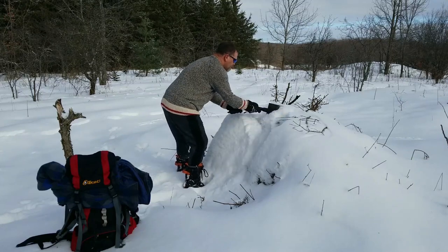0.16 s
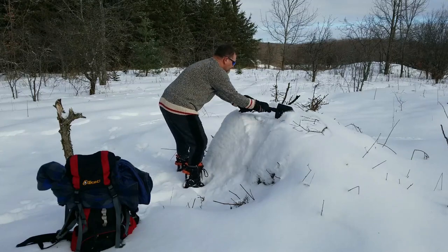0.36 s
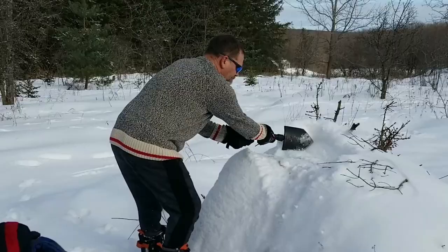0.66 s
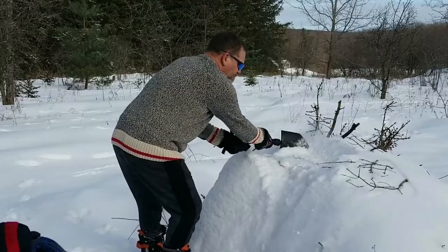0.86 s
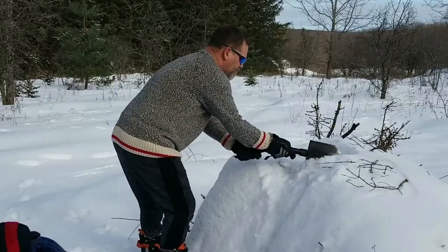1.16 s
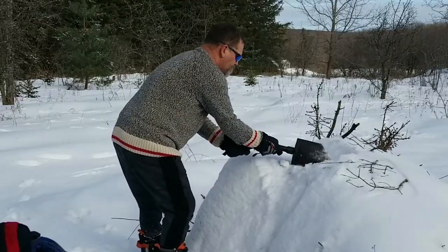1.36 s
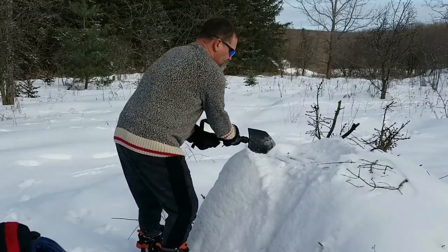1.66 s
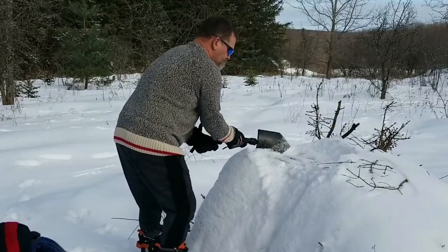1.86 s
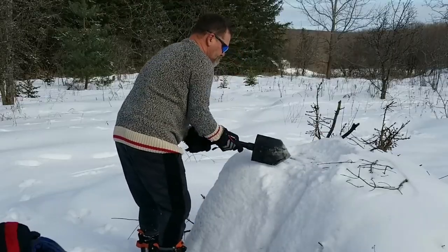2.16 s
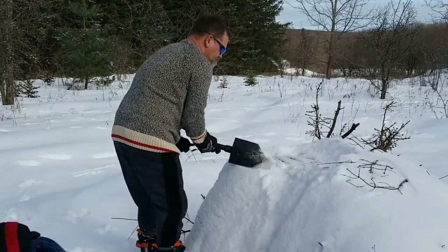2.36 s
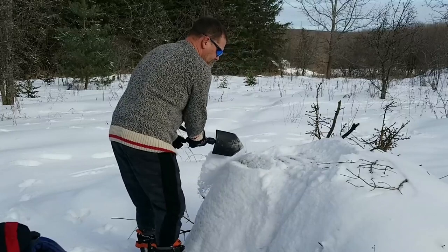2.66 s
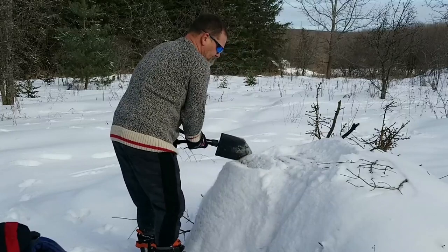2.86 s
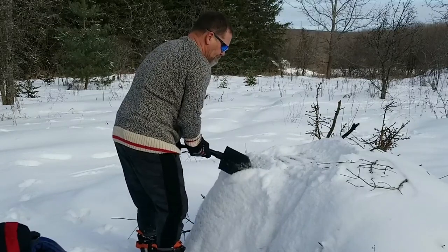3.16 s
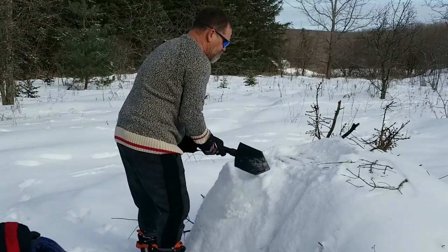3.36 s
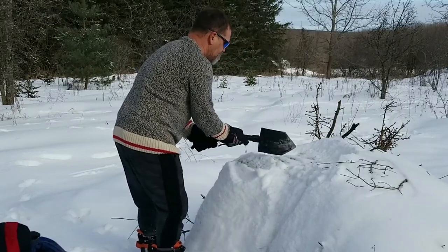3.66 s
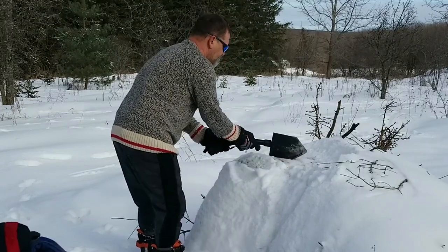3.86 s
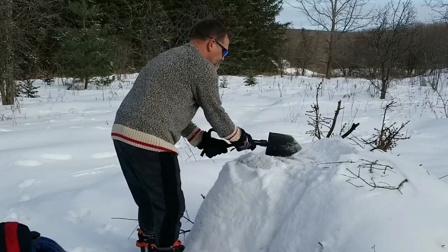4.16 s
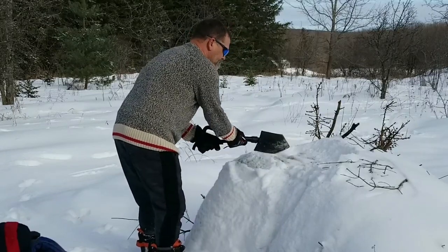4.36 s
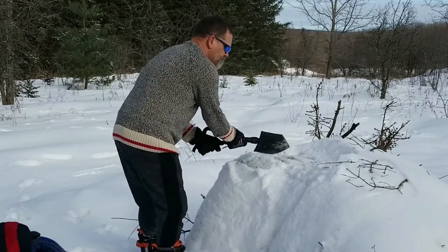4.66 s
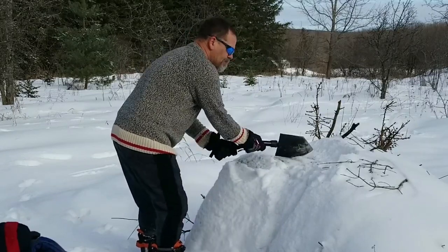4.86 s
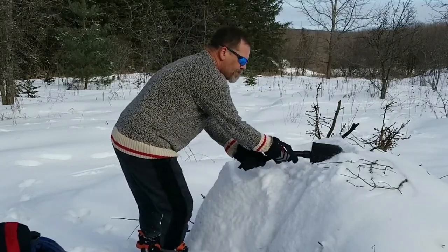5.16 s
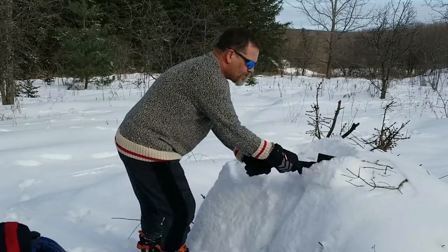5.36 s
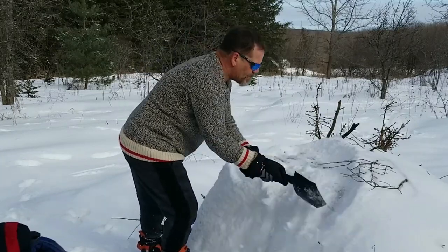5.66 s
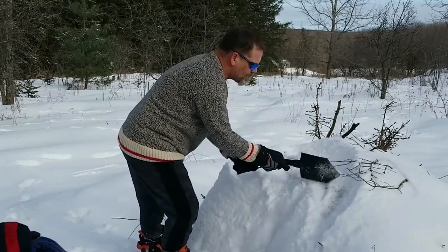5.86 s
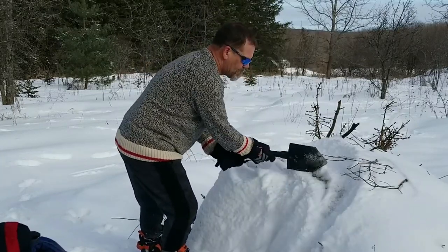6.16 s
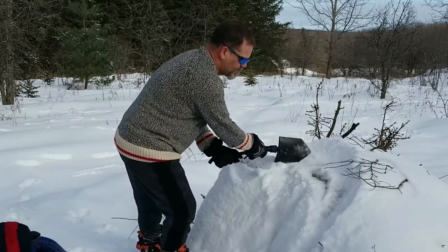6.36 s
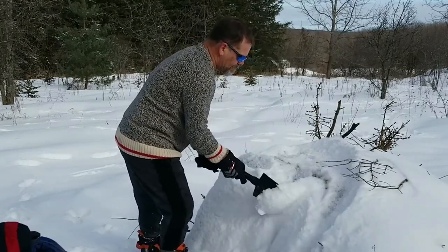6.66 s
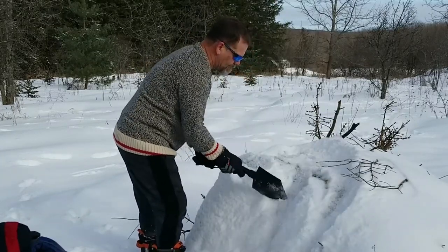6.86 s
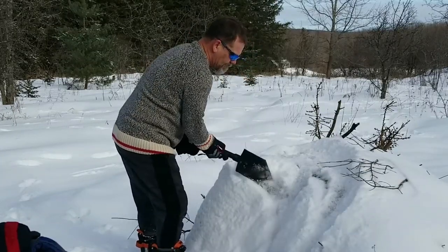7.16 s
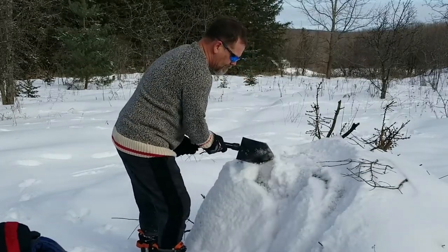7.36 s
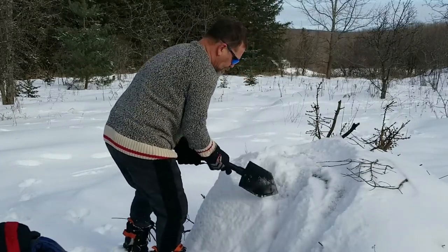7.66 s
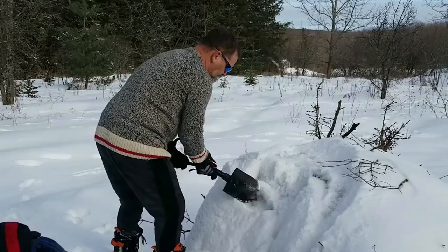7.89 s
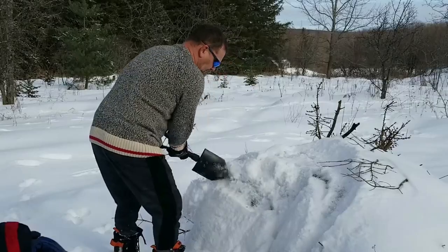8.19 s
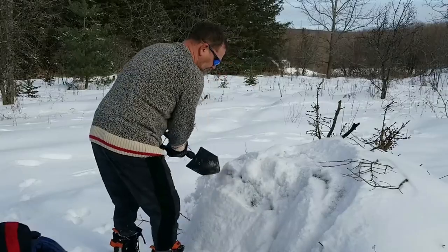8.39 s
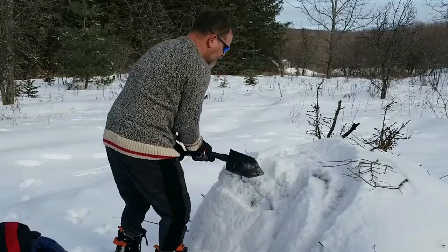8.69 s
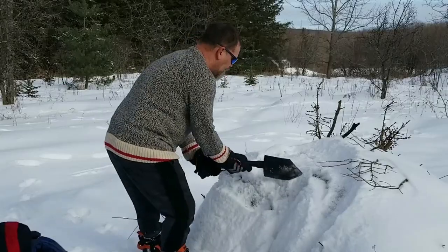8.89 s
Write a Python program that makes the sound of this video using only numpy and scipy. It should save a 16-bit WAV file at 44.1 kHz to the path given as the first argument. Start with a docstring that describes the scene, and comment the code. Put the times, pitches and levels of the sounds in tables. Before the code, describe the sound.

A close stereo microphone in a snowy clearing hears a small steel shovel, slightly left. From 0 to 0.8 s there are faint hisses of ice grains and light taps. Firm knocks with crunch come at 1.0, then a rapid, loud cluster of scrapes and metallic clinks at 1.35-1.6. A chop at 1.9-2.1 leaves a short ring; another tight crunching cluster lands at 2.45-2.55, a single clink at 2.9, then a pause. Lighter scrapes resume at 3.9-4.3. At 4.8-5.1 the freer blade rings longer through hissing strokes. Heavy crunching blows fill 5.8-6.15, followed by softer scrapes to 6.6 and again at 6.9-7.4. A deeper dig at 7.8-8.2 ends with two hard cracks; then near silence and a faint touch at 9.0. Low, soft wind buffets unevenly throughout, swelling near 6.9; a faint diffuse echo follows the blows.

```python
"""A faint hiss of ice grains, then crunching pushes and sharp knocks: a small steel shovel works crusted snow.
It chops and scrapes a mound in a clearing among winter trees. Random snaps through colouring filters make
the crunch and hiss; resonators make the rubbed blade sing. Each knock adds noise bursts for thud and crack
and decaying sines for the blade, brief when buried, longer when lifted clear. Shaped noise makes the light
wind on the microphone; decaying noise tails make the ground's answer and the faint echo of the trees."""
import sys
import numpy as np
from scipy import signal
from scipy.fft import rfft, irfft, next_fast_len
from scipy.io import wavfile
from scipy.ndimage import uniform_filter1d

SR = 44100
rng = np.random.default_rng(int(sys.argv[2]) if len(sys.argv) > 2 else 0)


def pcm_store(signal):
    """Save signal as 16-bit PCM."""
    levels = np.round(np.clip(np.atleast_2d(signal), -1, 1) * 32767)
    wavfile.write(sys.argv[1], SR, levels.astype(np.int16).T)


N = 398223

# Strong bending modes of the blade. Each row: nominal pitch in Hz, mean level when rubbed in dB,
# level when struck in dB relative to the whole ring, ring time as a share of the common t60.
BENDING_MODES = [(922, -25, -16.5, .58), (2044, -6.5, -8, 0.97), (2322, -5.5, -8, .58), (2534, -5, -8, .92),
                 (3322, -9.5, -10, 0.93)]
# Weaker modes of the blade. Each row: nominal pitch in Hz, mean relative level in dB,
# ring time as a share of their common t60.
WEAKER_MODES = [(372, -14.5, 1.6), (526.3, -5.5, 1), (1583, -11, 1.4), (3244, -1.5, 0.96), (3415, -8, .9),
                (3920, -2, 1), (4080, -4, 0.7), (4492, -3, 1), (5300, -3.5, 0.5), (5675, -6, 1.1),
                (6680, -7, 0.88), (8080, 0.5, 0.58), (11750, -3, 0.63)]


def from_db(db):
    """Decibels to gain."""
    return 10 ** (np.asarray(db) / 20)


def rms_one(x):
    """Scale to unit power."""
    return x / np.sqrt(np.mean(x ** 2) + 1e-20)


def in_time(rows):
    """Draw a curve of (seconds, value) rows at every sample."""
    seconds, values = np.transpose(rows)
    return np.interp(np.arange(N) / SR, seconds, values)


def drift(rate):
    """Random wander of unit power, drawn through this many random points per second."""
    knots = rng.standard_normal(int(N / SR * rate) + 2)
    return rms_one(np.interp(np.arange(N) / SR * rate, np.arange(len(knots)), knots))


def colour(x, points, size=4096):
    """Causal minimum-phase filter with the given spectrum; white noise keeps its power."""
    hz, db = np.transpose(points)
    grid = np.maximum(np.arange(size // 2 + 1) * SR / size, 1)
    gain = from_db(np.interp(np.log(grid), np.log(hz), db))
    # folding the cepstrum onto positive times gives minimum phase
    cepstrum = irfft(np.log(gain))
    cepstrum[1:size // 2] *= 2
    cepstrum[size // 2 + 1:] = 0
    response = irfft(np.exp(rfft(cepstrum)))
    return signal.oaconvolve(x, response / np.linalg.norm(response))[:len(x)]


def ring(x, hz, t60):
    """One resonant mode driven by x; white noise keeps its power."""
    radius = from_db(-60 / (max(t60, .002) * SR))
    angle = 2 * np.pi * hz / SR
    feed = np.sqrt((1 - radius * radius) / 2) * np.array([1, 0, -1])
    return signal.lfilter(feed, [1, -2 * radius * np.cos(angle), radius * radius], x + 1e-18)


def grains(per_s, spread_db):
    """Random snaps of uneven size and sign, at unit power."""
    sizes = from_db(spread_db * np.minimum(rng.exponential(1, N), 3.5))
    signs = rng.choice([-1, 1], N)
    return rms_one(sizes * signs * (rng.random(N) < per_s / SR))


def evened(x, span_s):
    """The hand keeps the work steady: power is levelled over each span, near-silence less so."""
    power = np.abs(uniform_filter1d(x * x, max(int(span_s * SR), 2)))
    return x / np.sqrt(power + 0.022)


def pressure():
    """Gains of crunch, singing and hiss: every push bites, swells, eases and stops, and leaves a trickle."""
    # Pushes of the blade through snow. Each row: three times in seconds, sorted to shape the effort
    # (swell, peak, ease), where the first sets the bite and the third when the stop and trickle begin;
    # then drive of packed snow crunching, blade singing and ice grains hissing in dB.
    strokes = [(0, .015, 0.036, -59, -59, -51), (0.039, 0.054, 0.072, -39, -43.5, -43),
               (.13, .18, .35, -57, -57, -54.5), (0.366, 0.424, .53, -64, -56.5, -54.5),
               (0.542, .56, 0.57, -45, -56.5, -50.5), (0.622, 0.743, 0.77, -70.5, -70, -53),
               (0.79, .81, 0.84, -76.5, -73, -55.5), (0.881, 0.948, 0.97, -48, -52, -38),
               (0.979, 1.044, 1.07, -49, -45, -42.5), (1.09, 1.127, 1.2, -47, -50.5, -44),
               (1.295, 1.424, 1.46, -49, -49.5, -49), (1.424, 1.462, 1.526, -35, -36, -33.5),
               (1.54, 1.567, 1.647, -55.5, -49.5, -48), (1.805, 1.856, 1.98, -53.5, -57, -44.5),
               (1.888, 1.966, 2.06, -38.5, -33, -34), (2.367, 2.402, 2.44, -59, -61.5, -51.5),
               (2.45, 2.492, 2.505, -37, -40, -40), (3.825, 3.882, 3.99, -61, -55.5, -56),
               (3.983, 4.074, 4.14, -47.5, -48, -47.5), (4.172, 4.225, 4.24, -46.5, -47, -44.5),
               (4.293, 4.306, 4.32, -47.5, -46, -43), (4.582, 4.605, 4.6, -86, -78, -65.5),
               (4.765, 4.85, 4.88, -49, -39, -38), (4.954, 5.075, 5.13, -42, -39.5, -38.5),
               (5.15, 5.16, 5.39, -64, -62, -57), (5.386, 5.452, 5.46, -50.5, -50, -45.5),
               (5.748, 5.766, 5.82, -75, -71, -65), (5.836, 5.89, 5.8, -42, -44, -47),
               (5.956, 5.979, 6.13, -32, -37, -36.5), (6.298, 6.303, 6.3, -69, -50, -46.5),
               (6.363, 6.353, 6.4, -51, -53.5, -46.5), (6.44, 6.459, 6.57, -50, -43, -40.5),
               (6.596, 6.664, 6.72, -80, -62, -62), (6.93, 6.948, 6.985, -56, -40.5, -38),
               (7, 7.05, 7.15, -41, -50, -42), (7.192, 7.225, 7.27, -55.5, -58, -54),
               (7.245, 7.297, 7.29, -48.5, -48, -44.5), (7.815, 7.92, 7.94, -55, -50, -45),
               (7.93, 8.04, 8.1, -38, -44.5, -37.5), (8.1, 8.15, 8.185, -38, -44, -39),
               (8.99, 9.021, 9.2, -57, -55, -53)]
    bite_s, build_db, ease_db = 0.019, 7.5, 7.5
    stop_db_per_s = 520
    trickle_db, trickle_db_per_s = -26, 52
    t = np.arange(0, N, 32) / SR
    power = np.zeros((3, 1))
    for bite_at, middle, stop_at, *levels_db in strokes:
        # the edge bites, pressure builds to the hardest moment, then eases
        bite = np.clip((t - bite_at) / bite_s + .5, 0, 1)
        after = np.maximum(t - stop_at, 0)
        effort_db = np.interp(t, np.sort([bite_at, middle, stop_at]), [-build_db, 0, -ease_db])
        push = from_db(effort_db - stop_db_per_s * after)
        trickle = from_db(trickle_db - trickle_db_per_s * after)
        power = power + np.outer(from_db(levels_db), bite * np.maximum(push, trickle)) ** 2
    return [np.interp(np.arange(N) / SR, t, np.sqrt(p)) for p in power]


def snowpack(x):
    """Light touches have little bass, heavy ones shake the mound; the hollow of the cut colours both."""
    # The hollow of the cut, lower where the blade goes deeper. Each row: time in seconds, pitch in Hz.
    hollow = [(0, 540), (5.5, 560), (5.95, 700), (7.2, 700), (7.9, 395)]
    hollow_db, hollow_t60_s = -23, 0.016
    heavy_db, mound_hz = -35.5, 420   # at this load the lows below this pitch pass in full
    load = np.sqrt(np.abs(uniform_filter1d(x * x, int(.03 * SR))))
    depth = np.minimum(load / from_db(heavy_db), 1)
    # each filter runs twice, so that the two bands join smoothly
    low, high = [np.tile(signal.butter(2, mound_hz, kind, fs=SR, output="sos"), (2, 1))
                 for kind in ("low", "high")]
    x = signal.sosfilt(high, x + 1e-18) + signal.sosfilt(low, x * depth + 1e-18)
    # the moving pitch is a crossfade between fixed resonators
    hollow_hz = in_time(hollow)
    pitches = np.geomspace(350, 850, 7)
    shares = [np.interp(hollow_hz, pitches, one) for one in np.eye(len(pitches))]
    resonance = sum(ring(x * share, hz, hollow_t60_s) for hz, share in zip(pitches, shares))
    return x + from_db(hollow_db) * resonance


def scraping():
    """Snow slips in small steps: clumps crunch, grains hiss, both rub the damped blade. Gives (direct, spray)."""
    # Colour of crunching snow. Each row: frequency in Hz, relative level in dB.
    crunch_colour = [(40, -8), (220, -6), (300, -8), (430, -2), (650, 0), (900, -2.2), (1200, -3),
                     (1650, -5), (2400, -10), (4500, -27)]
    # Colour of hissing grains. Each row: frequency in Hz, relative level in dB.
    grit_colour = [(500, -10), (1400, 0), (2400, 1), (3300, -4.5), (5000, -3), (7500, 1.5), (9500, -3.5),
                   (15500, 1.5)]
    crunching, singing, hissing = pressure()
    slips = from_db(2.69 * drift(130))
    clumps = evened(grains(per_s=400, spread_db=1.0) * slips, span_s=0.065)
    ice, loose_ice = [evened(grains(per_s=6000, spread_db=3.0) * slips, span_s=.06) for side in range(2)]
    lumps = from_db(1.5 * drift(45))
    crunch = snowpack(colour((clumps + 0.12 * ice) * lumps * crunching, crunch_colour))
    hiss = colour((ice + 0.2 * clumps) * hissing, grit_colour)
    spray = colour(loose_ice * hissing, grit_colour)
    # the point of contact wanders over the blade, favouring now one mode, now another
    rub = (clumps + ice) * singing
    blade = sum(ring(rub * from_db(db + 3.8 * drift(9)), hz, 0.055 * share)
                for hz, db, _, share in BENDING_MODES)
    skid = ice * hissing * from_db(-14.5)
    edge = sum(ring(skid * from_db(db + 3.5 * drift(9)), hz, 0.054 * share)
               for hz, db, share in WEAKER_MODES if hz > 3000)
    return np.array([crunch + hiss + blade + edge, spray])


def wind():
    """Lumpy low buffeting on the microphone, partly shared by its two ports, over a faint even background."""
    # Strength of the wind before its eddies. Each row: time in seconds, level in dB.
    gusts = [(0.0, -62), (2.08, -62.5), (2.31, -75), (2.55, -59), (3.14, -72.5), (3.7, -67), (4.3, -52.5),
             (5.33, -66), (5.46, -50), (5.56, -70), (6.39, -53), (6.85, -46), (7.36, -55), (7.6, -49),
             (8.3, -54), (9.03, -57)]
    # Colour of the buffeting. Each row: frequency in Hz, relative level in dB.
    buffet_colour = [(15, -13.5), (30, -3.5), (55, 3), (80, -4), (120, -15.5), (200, -29.5), (400, -36.5),
                     (1000, -67.5)]
    # Colour of the even background. Each row: frequency in Hz, relative level in dB.
    air_colour = [(59, -34), (100, -1.5), (143, -6), (266, -12.5), (406, -4.5), (570, -19), (1060, -17.5),
                  (1280, -4.5), (1450, -22.5), (7450, -33.5), (12700, -18.5), (16000, -20)]
    air_db = -71
    gust_db = in_time(gusts)
    shared = rng.standard_normal(N)
    buffet = np.array([rms_one(colour(0.55 * shared + rng.standard_normal(N), buffet_colour))
                       for side in range(2)])
    air = np.array([rms_one(colour(rng.standard_normal(N), air_colour)) for side in range(2)])
    eddies_db = 4.0 * drift(16)
    balance = from_db([[-2.5], [2.5]])   # stronger on the right
    return buffet * from_db(gust_db + eddies_db) * balance + air * from_db(air_db)


def unit_attack(x, t):
    """Scale to unit power over the first 20 ms."""
    return x / np.sqrt(np.mean(x[t < .02] ** 2) + 1e-20)


def fracture(t, snap, crumble_t60):
    """The crust breaks with one snap and a dying shower of smaller ones."""
    uneven = from_db(3.5 * rng.standard_normal(len(t)))
    shower = rng.standard_normal(len(t)) * uneven * from_db(-60 * t / crumble_t60)
    shower *= 1 - np.exp(-t / 0.00053)
    shower /= np.linalg.norm(shower)
    shower[0] += snap
    return unit_attack(shower, t)


def strike(t, hz, t60):
    """A struck mode: a sine that dies ever faster as snow settles on the blade."""
    snow_load = .003   # clinging snow detunes the modes from blow to blow by this share
    fall = from_db(-60 * (t / max(t60, .01)) ** 1.46)
    attack = 1 - np.exp(-t / 0.00071)
    loaded_hz = hz * (1 + snow_load * rng.standard_normal())
    wave = np.sin(2 * np.pi * loaded_hz * t + rng.uniform(0, 2 * np.pi))
    return unit_attack(wave * fall * attack, t)


def knocking():
    """Each blow thuds, cracks crust and rings, led by the mode its contact point favours. Gives (direct, spray)."""
    # Blows of the blade on crust. Each row: time in seconds, thud in dB before the snowpack, crack in dB,
    # whole blade ringing in dB, leading mode in Hz (the nearest bending mode leads), leading mode in dB,
    # common ring t60 in seconds.
    knocks = [(.062, -37, -49, -54, 2322, -53, .086), (.144, -48.5, -45.5, -47, 2534, -43, 0.019),
              (.548, -40, -52, -53.5, 2322, -55, 0.058), (.584, -44, -57.5, -60.5, 2322, -61, .05),
              (0.74, -63, -53, -57.5, 2322, -51.5, 0.024), (.844, -44, -29.5, -44.5, 2043, -44, .08),
              (.989, -28.5, -29, -35.5, 2043, -29.5, 0.11), (1.053, -29.5, -27.5, -34, 2322, -27, 0.037),
              (1.116, -39, -50.5, -46.5, 2043, -49, 0.081), (1.352, -43, -61, -56, 2043, -46.5, 0.087),
              (1.401, -40, -45, -47, 2322, -42, 0.052), (1.445, -30.5, -34, -33.5, 2534, -28.5, 0.03),
              (1.464, -39.5, -26.5, -32.5, 2534, -27.5, 0.18), (1.485, -32.5, -25, -30.5, 2043, -24, 0.12),
              (1.51, -30.5, -37, -37, 2043, -37, 0.071), (1.554, -28, -31.5, -31.5, 2534, -26.5, 0.1),
              (1.779, -58.5, -44.5, -52, 3322, -50.5, 0.053), (1.865, -41, -36, -45.5, 3322, -45.5, 0.062),
              (1.892, -41.5, -48, -39, 2043, -36.5, 0.16), (2.011, -32, -32, -36, 2534, -42.5, .28),
              (2.064, -45.5, -40, -46, 2534, -46, .52), (2.44, -46, -46, -50, 2322, -50, 0.044),
              (2.466, -32.5, -33.5, -31.5, 2322, -34.5, 0.23), (2.487, -28, -28.5, -32, 2534, -35, 0.053),
              (2.511, -27.5, -32.5, -34, 2534, -32.5, .11), (2.532, -33, -38.5, -41.5, 2534, -43.5, 0.069),
              (2.881, -40, -45.5, -43, 2534, -43, .26), (3.887, -52, -70, -57, 2322, -42.5, 0.17),
              (3.93, -49, -53, -57, 2322, -52, 0.051), (4.15, -44.5, -35.5, -38, 2322, -36, 0.16),
              (4.222, -44, -44.5, -44.5, 2043, -39.5, 0.041), (4.26, -42.5, -55, -49, 2043, -50, 0.068),
              (4.806, -44, -46, -36, 922, -41, .42), (4.849, -55, -43, -35, 3322, -41, .34),
              (4.97, -51.5, -31, -34.5, 2534, -29.5, 0.37), (5.047, -47, -52, -43.5, 2322, -37, 0.4),
              (5.84, -31.5, -29.5, -32, 2043, -31, 0.17), (5.885, -34, -26, -35, 2322, -36, .04),
              (5.903, -37.5, -33.5, -43, 2322, -41.5, 0.037), (5.936, -39.5, -41, -56, 2534, -39, 0.032),
              (5.984, -29, -35.5, -36, 2322, -31, 0.089), (6.024, -31.5, -50, -41.5, 2322, -36, 0.04),
              (6.104, -30, -44, -44, 2534, -41, .07), (6.149, -35.5, -42, -58, 2534, -46, 0.085),
              (6.31, -66, -60, -49.5, 3322, -47, 0.21), (6.396, -48, -40.5, -43, 2043, -57, 0.098),
              (6.488, -40, -59, -54, 922, -59, 0.089), (6.912, -67, -53.5, -55, 2534, -44, 0.14),
              (7.137, -40, -60, -60, 922, -56, 0.047), (7.407, -55, -45, -55, 2043, -47, .47),
              (8.159, -32, -23, -39, 2534, -35.5, 0.043), (8.221, -26, -30.5, -38.5, 2043, -30.5, 0.17),
              (8.478, -81.5, -85, -90, 2322, -68, 0.29), (9.003, -41.5, -65.5, -51, 2322, -45, 0.11)]
    # Colour of the thud. Each row: frequency in Hz, relative level in dB.
    thud_colour = [(40, -4.5), (200, -5), (290, -5.5), (400, -1), (520, 2), (800, 2), (1700, -4.5),
                   (2600, -3), (4500, -23)]
    # Colour of cracking crust. Each row: frequency in Hz, relative level in dB.
    crack_colour = [(600, -15.5), (1500, 1), (2600, 6), (4000, -1.5), (6000, 3.5), (8000, -1.5),
                    (10000, -1.5), (15500, 1)]
    side_modes_share = .88   # modes that the blow does not favour die a little sooner
    thuds, cracks, sprays, rings = np.zeros((4, N + SR))
    for s, thud_db, crack_db, ring_db, lead_hz, lead_db, t60 in knocks:
        at = max(int(s * SR), 0)
        t = np.arange(int(.12 * SR)) / SR
        burst = slice(at, at + len(t))
        thuds[burst] += fracture(t, snap=0.76, crumble_t60=0.05) * from_db(thud_db)
        cracks[burst] += fracture(t, snap=.25, crumble_t60=0.046) * from_db(crack_db)
        sprays[burst] += fracture(t, snap=0.11, crumble_t60=0.083) * from_db(crack_db)

        t = np.arange(int(min(t60 + .07, .9) * SR)) / SR
        leader = min(BENDING_MODES, key=lambda mode: abs(mode[0] - lead_hz))[0]
        bend = np.zeros(len(t))
        for hz, _, db, share in BENDING_MODES:
            if hz == leader:
                bend += strike(t, hz, t60 * share) * from_db(lead_db)
            else:
                bend += strike(t, hz, t60 * share * side_modes_share) * from_db(ring_db + db)
        # the weaker modes, low and high, die soon even when the blade is free
        weaker_t60 = 0.098 + 0.084 * t60
        weaker = sum(strike(t, hz, weaker_t60 * share) * from_db(db + rng.normal(0, 2.1))
                     for hz, db, share in WEAKER_MODES)
        rings[at:at + len(t)] += bend + unit_attack(weaker, t) * from_db(ring_db)
    thud = snowpack(colour(thuds[:N], thud_colour))
    crack = colour(cracks[:N], crack_colour)
    return np.array([thud + crack + rings[:N], colour(sprays[:N], crack_colour)])


def scatter(x, t60, delay_s, spectrum):
    """Diffuse reflections that build up and die away, unrelated at the two ports of the microphone."""
    t = np.arange(SR) / SR
    shape = from_db(-60 * t / t60) * (1 - np.exp(-t / delay_s))
    tails = [colour(rng.standard_normal(SR) * shape, spectrum) for side in range(2)]
    return np.array([signal.oaconvolve(x, tail / np.linalg.norm(tail))[:N] for tail in tails])


def clearing(direct, spray):
    """The blade reaches the two ports apart in time and level, grains from ahead; ground and trees answer."""
    left_lag_s, left_lead_db = .00004, 4.5   # left is later but louder
    # a phase slope delays by a fraction of a sample
    size = next_fast_len(N + 64)
    lag = np.exp(-2j * np.pi * np.fft.rfftfreq(size, 1 / SR) * left_lag_s)
    late = irfft(rfft(direct, size) * lag, size)[:N]
    ground = scatter(direct, t60=.04, delay_s=.001, spectrum=[(300, 0), (15000, 0)])
    trees = scatter(direct, t60=0.81, delay_s=0.0062,
                    spectrum=[(200, -7.0), (800, -11.5), (2200, -5.5), (4500, -1.5), (8000, -9), (15000, -11.0)])
    heard = np.array([late, direct]) + from_db(-2.5) * spray
    heard = heard + from_db(-12.0) * ground + from_db(-27) * trees
    return heard * from_db(np.array([[1], [-1]]) * left_lead_db / 2)


def scene():
    """The shovel in its clearing, and the wind."""
    direct, spray = scraping() + knocking()
    return clearing(direct, spray) + wind()


def record(dry):
    """A steep elliptic low-pass cuts the top above 15.9 kHz."""
    return signal.sosfilt(signal.ellip(10, .2, 70, 15900, fs=SR, output="sos"), dry)


dry = scene()
out = record(dry)
pcm_store(out)
```